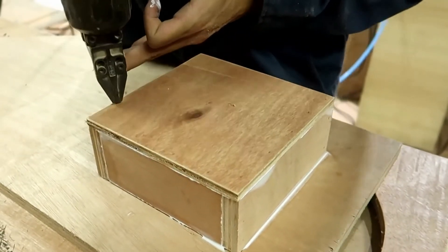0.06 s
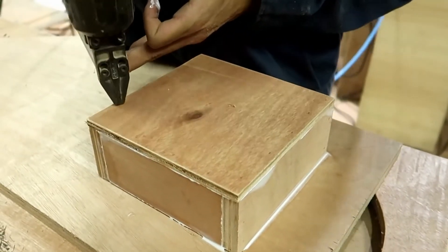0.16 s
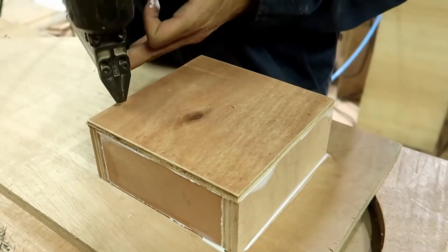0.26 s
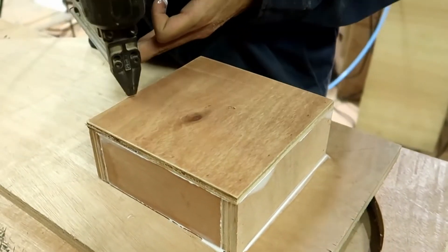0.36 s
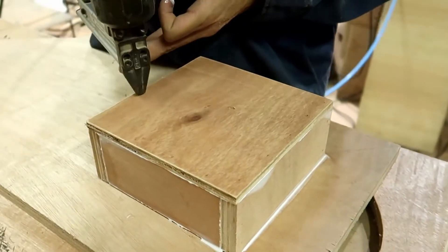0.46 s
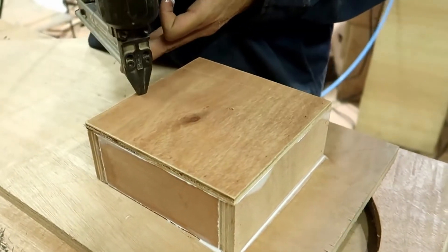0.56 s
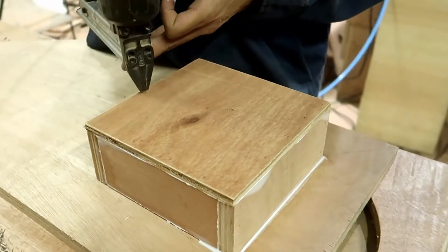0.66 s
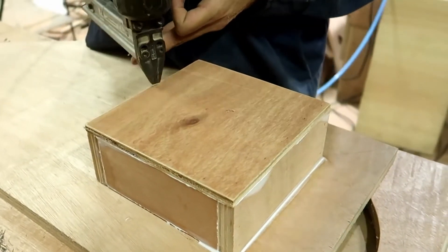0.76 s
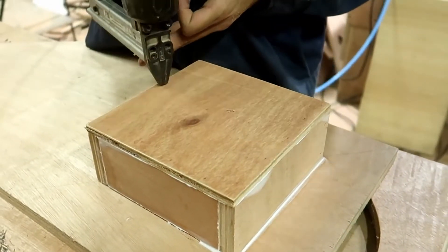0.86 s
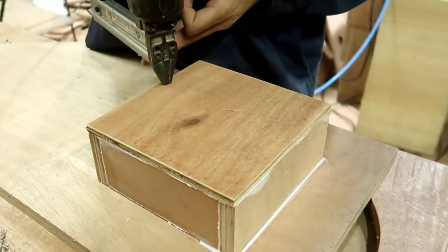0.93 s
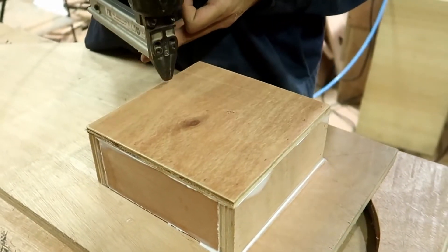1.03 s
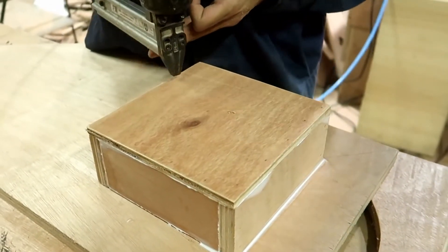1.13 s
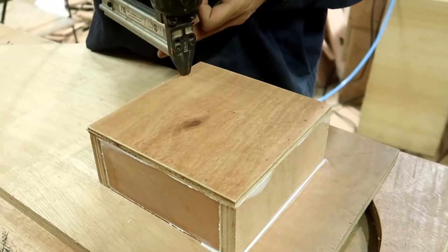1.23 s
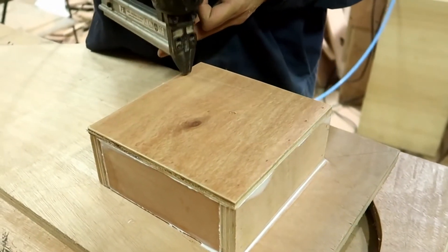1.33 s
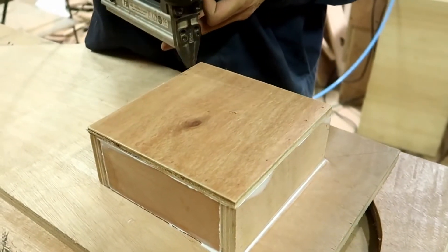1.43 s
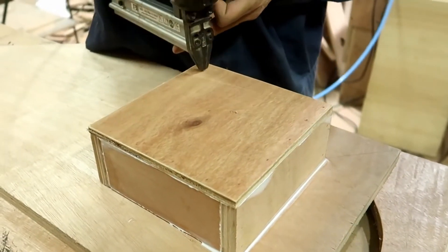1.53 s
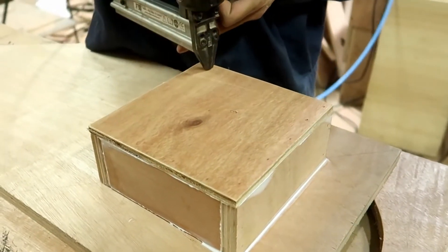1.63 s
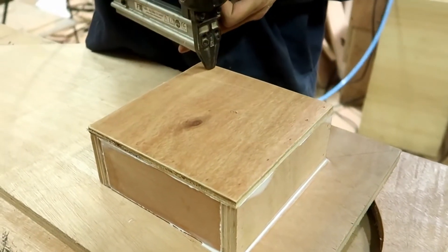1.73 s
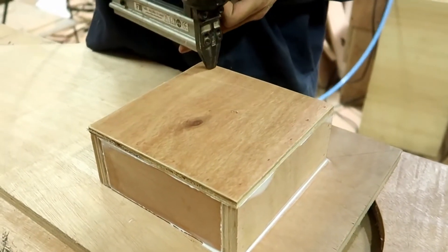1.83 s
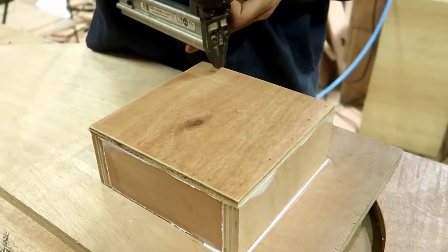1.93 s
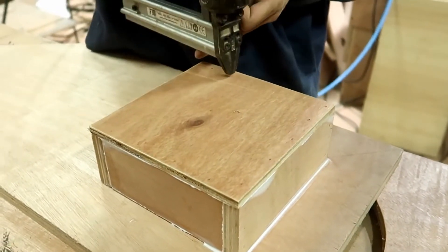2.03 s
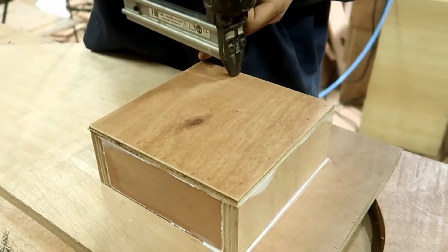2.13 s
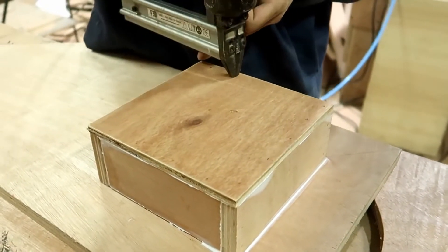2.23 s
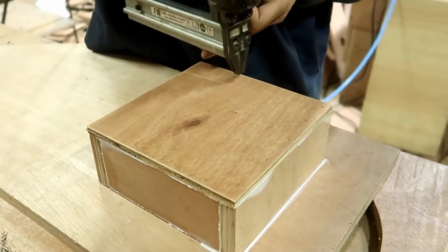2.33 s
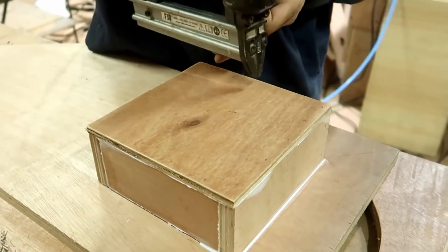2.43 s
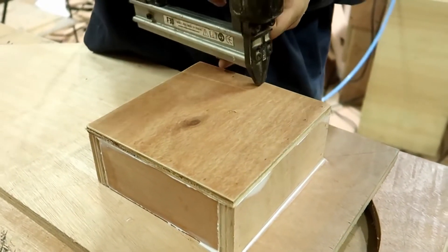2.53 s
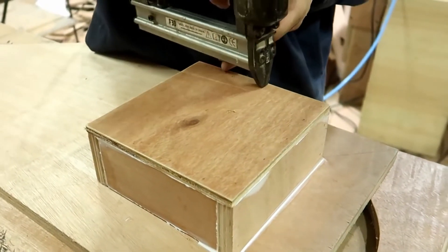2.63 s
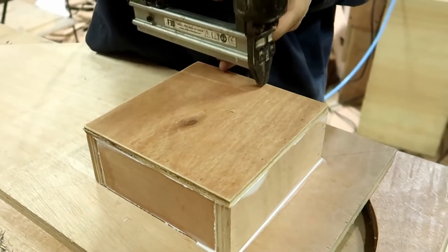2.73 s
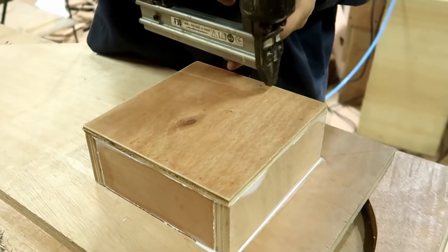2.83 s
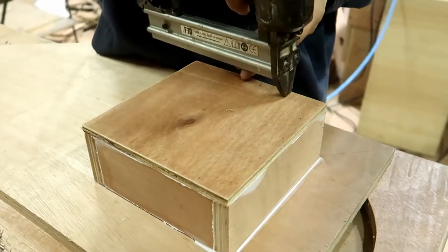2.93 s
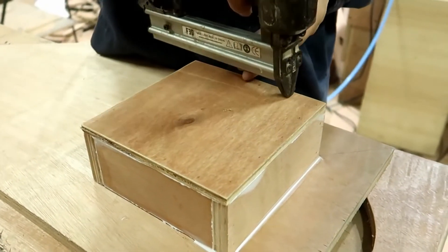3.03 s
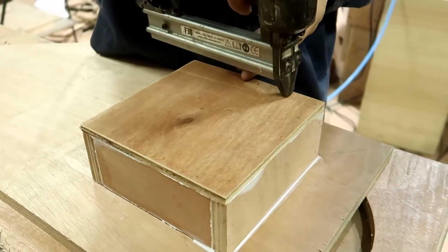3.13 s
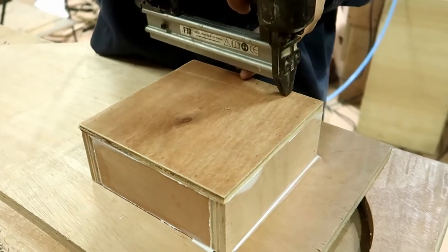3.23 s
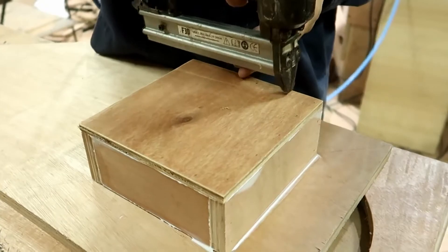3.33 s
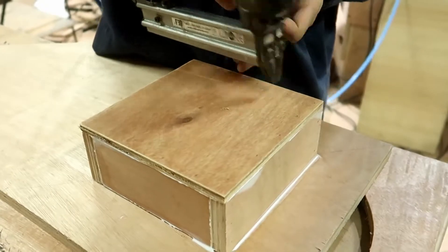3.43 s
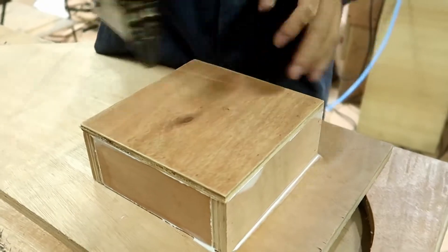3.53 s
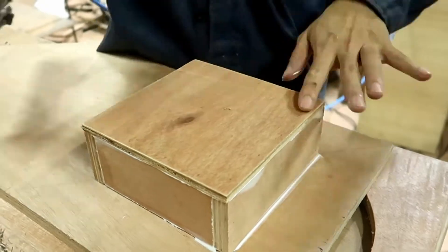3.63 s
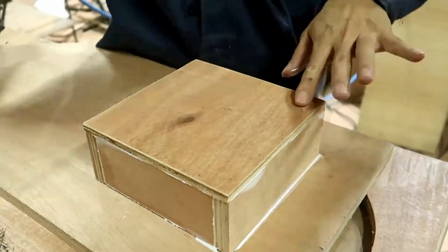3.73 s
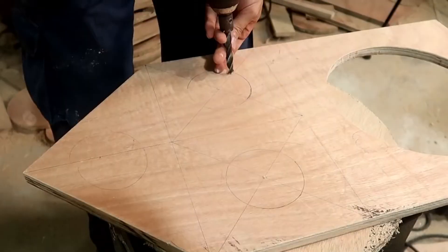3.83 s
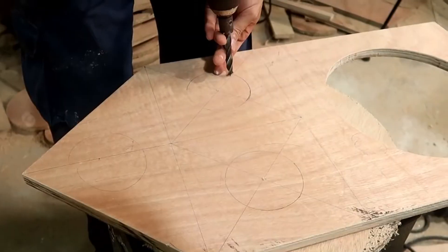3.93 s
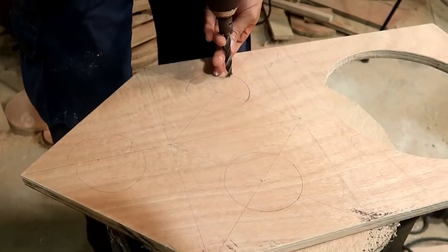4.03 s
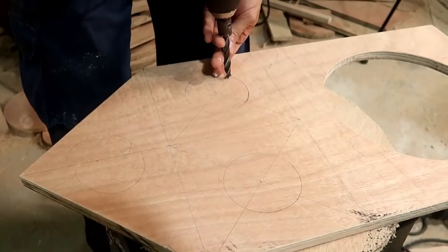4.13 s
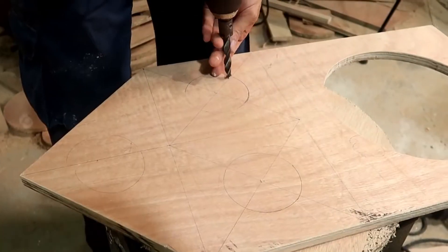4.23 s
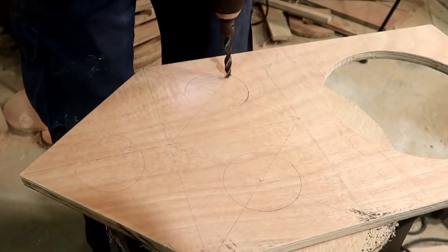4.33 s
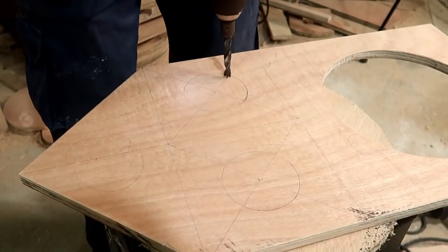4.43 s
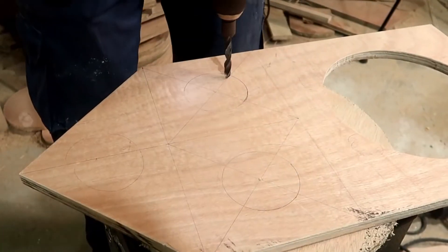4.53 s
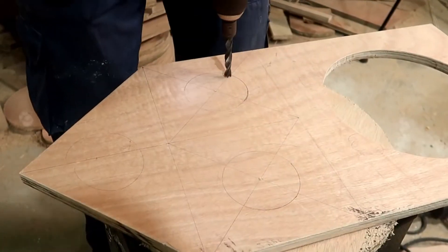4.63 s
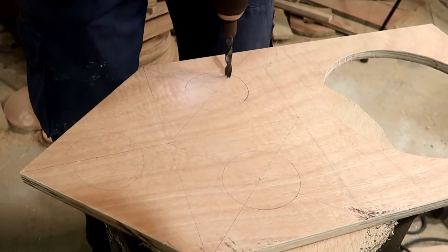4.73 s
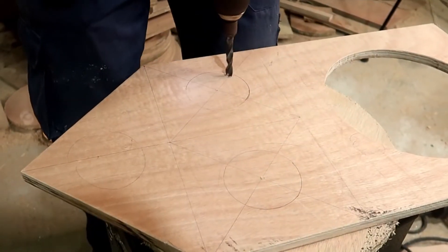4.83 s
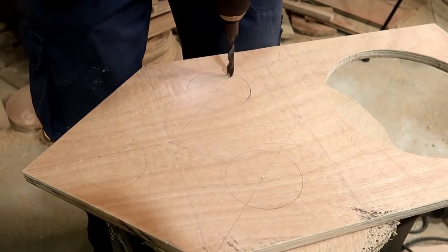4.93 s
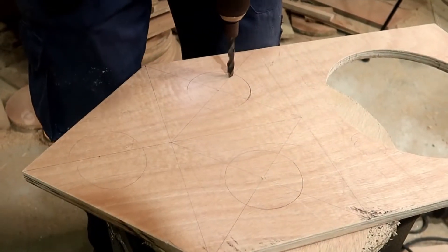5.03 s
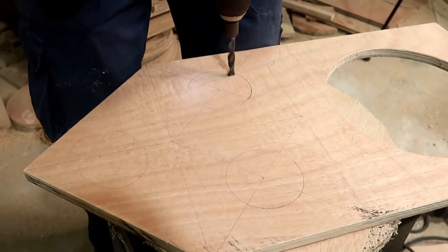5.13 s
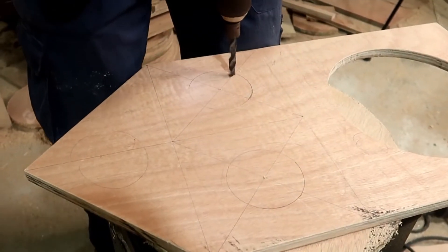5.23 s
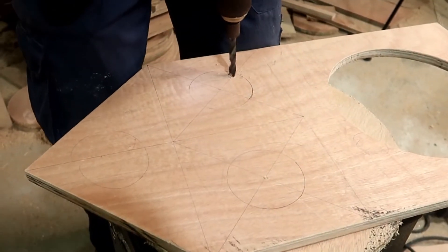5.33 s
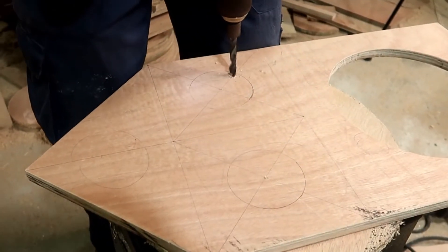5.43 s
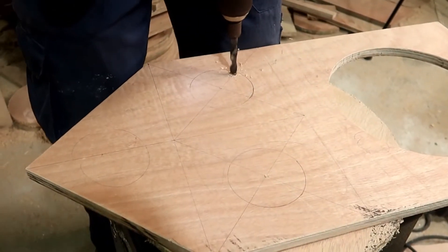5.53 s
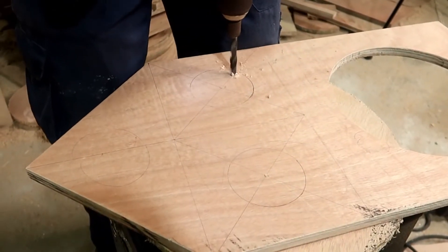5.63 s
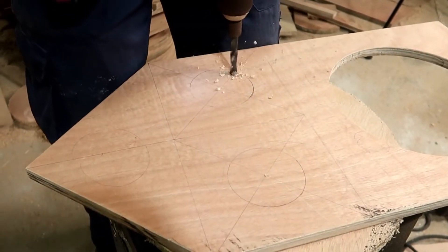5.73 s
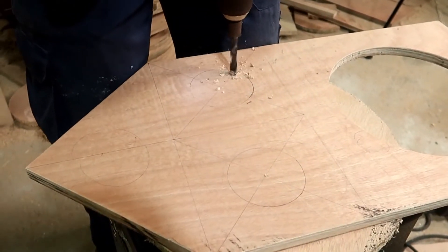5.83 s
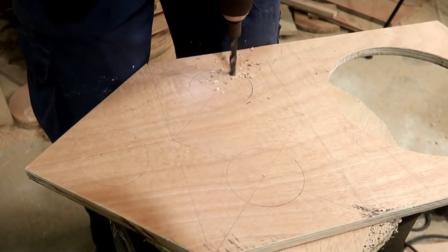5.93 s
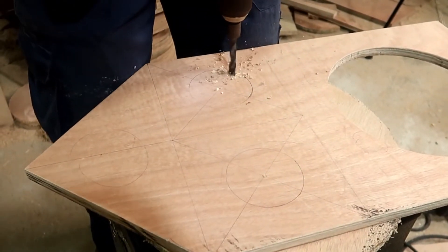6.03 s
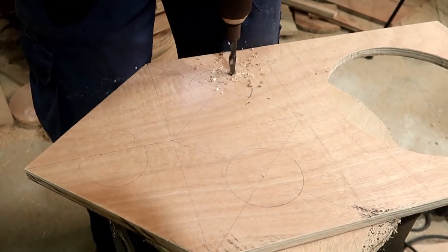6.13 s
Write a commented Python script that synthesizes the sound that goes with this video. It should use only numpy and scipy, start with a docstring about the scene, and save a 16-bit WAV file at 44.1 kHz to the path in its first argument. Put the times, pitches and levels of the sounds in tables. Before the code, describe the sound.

The tail of an exhaust puff opens a quiet workshop. Eight close pneumatic nailer shots hit a hollow plywood box at about 0.34, 0.68, 1.09, 1.41, 1.93, 2.34, 2.82 and 3.41 seconds. Each has a soft hiss swelling just before a sharp double crack, woody knock and rattle, then some 70 milliseconds later an exhaust puff and metallic clack. The fourth and fifth are weaker, the last two loudest; faint nose taps fall between, with a short room tail. At 3.81 comes a tiny gap, then a noisier shed: low hum and lumpy wind knocks on the microphones. Trigger clicks come at 4.09 and 4.4-4.48, with thin high squeaks. From 4.5 the drill growls slowly, rises steeply after 4.8 and reaches full whine by 5.3. Around 5.67 the bit sinks in: louder throbbing rasp, crackling chips and a straining whine that sags towards 6.17.

```python
"""In a quiet workshop a pneumatic nail gun fires eight brads into a plywood box: a soft hiss swelling just before
the blow, the blow on the nail, exhaust puff and clack of the returning piston, from shaped noise and ringing
modes with a noise-tail room. After a short gap comes a noisier shed: low noise and pressure knocks are wind on
the microphones, and an electric drill spins up and bores into a panel, from speed-following tones, motor rush
and random chips."""
import sys
import numpy as np
from scipy import signal
from scipy.io import wavfile
from scipy.ndimage import uniform_filter1d

SR = 44100
rng = np.random.default_rng(int(sys.argv[2]) if len(sys.argv) > 2 else 0)


def put_to_file(sound):
    """Save the sound as 16-bit audio at rate SR, in the file named by the first command-line argument."""
    columns = np.atleast_2d(sound).T  # one column per channel
    safe = np.clip(columns, -1, 1)
    whole_steps = np.round(safe * 32767)
    wavfile.write(sys.argv[1], SR, whole_steps.astype(np.int16))


N = 272097
LEAD = 4410  # samples before time zero
EVENT = 2600  # samples in a short event
EVENT_MS = np.arange(EVENT) / SR * 1000 - 10  # zero at the peak of swell()
TIME_S = np.arange(N) / SR


def amp(db):
    """Gain of a level in dB."""
    return 10 ** (np.asarray(db) / 20)


def evened(x):
    """Scaled to rms 1."""
    return x / np.sqrt(np.mean(x ** 2) + 1e-20)


def read(points, hz):
    """Value of a spectrum on a log-frequency axis."""
    f, value = np.transpose(points)
    return np.interp(np.log(hz + 1), np.log(f + 1), value)


def curve(rows):
    """Columns of a table at every sample, then a smoothed gate, 1 inside its time span."""
    s, *columns = np.transpose(rows)
    inside = 1. * (TIME_S > s[0]) * (TIME_S <= s[-1])
    return [np.interp(TIME_S, s, c) for c in columns] + [uniform_filter1d(inside, size=300)]


def add(mix, s, sound):
    """Mixes a sound in at s seconds; the mix starts LEAD samples early."""
    part = mix[LEAD + round(s * SR):][:len(sound)]
    part += sound[:len(part)]


def coloured(x, points):
    """Causal minimum-phase filter shaped by a spectrum, taps of unit energy."""
    log_gain = np.log(amp(read(points, abs(np.fft.fftfreq(4096, 1 / SR)))))
    taps = np.fft.ifft(np.exp(np.conj(signal.hilbert(log_gain)))).real[:2048]
    return signal.oaconvolve(x, taps / np.linalg.norm(taps))


def ring(modes, detune=.0, size=6000):
    """Dying sines of a struck body, levels and pitches scattered, peak 1."""
    t = np.arange(size) / SR
    x = np.zeros(size)
    for hz, db, t60 in modes:
        decay = amp(db - 60 * t / t60 + 3.7 * rng.standard_normal())
        x += decay * np.sin(2 * np.pi * hz * (1 + detune * rng.standard_normal()) * t)
    return x / abs(x).max()


def resonate(x, hz, width):
    """Shifts hz down to zero, smooths, and shifts back: a resonance of gain 1."""
    turn = np.exp(2j * np.pi * np.cumsum(hz * np.ones(len(x))) / SR)
    r = np.exp(-np.pi * width / SR)
    return 2 * (turn * signal.lfilter([1 - r], [1, -r], x / turn)).real


def noise(db, same, patchy_db):
    """Two channels of random short-time spectra, rms 1; db maps (Hz, s) to relative level."""
    frames, hz = N // 256 + 5, np.fft.rfftfreq(1024, 1 / SR)[:, None]
    a, b, c, d, patches = rng.standard_normal((frames, 513, 5)).T
    patches = uniform_filter1d(uniform_filter1d(patches, size=10, axis=0), size=10, axis=1)
    same = np.clip(read(same, hz), -1, 1)
    left = a + 1j * b
    right = same * left + np.sqrt(1 - same ** 2) * (c + 1j * d)
    level = amp(db(hz, np.arange(frames) * 256 / SR))
    level = level / np.sqrt((level ** 2).mean(0)) * amp(patchy_db * evened(patches))
    return evened(signal.istft(np.array([left, right]) * level, nperseg=1024, noverlap=768)[1][:, :N])


def steady(spectrum):
    """Level function for noise(): one spectrum at all times."""
    return lambda hz, t: read(spectrum, hz) + 0 * t


def swell(rise_ms, fall_ms):
    """Envelope that peaks at 10 ms and is gone by 59 ms."""
    end = np.clip((49 - EVENT_MS) / 25, 0, 1)
    rise, fall = np.exp(-(EVENT_MS / rise_ms) ** 2), np.exp(-np.maximum(EVENT_MS, 0) / fall_ms)
    return end * np.where(EVENT_MS < 0, rise, fall)


def burst(envelope):
    """White noise under an envelope."""
    return rng.standard_normal(EVENT) * envelope


# workshop air spectrum: f/Hz, relative level/dB
QUIET_SPECTRUM = [(20, -28), (60, -8.5), (180, -3), (300, -17), (600, -8.5), (1100, -16), (1700, -20.5),
                  (2500, -28), (4000, -34.5), (6000, -45), (16000, -62)]
# workshop air over time: t/s, level/dB
QUIET_LEVEL = [(0.15, -67), (0.63, -66.5), (0.93, -70), (1.8, -67), (2.03, -68.5), (2.32, -65.5),
               (2.51, -69), (2.75, -65), (2.86, -61.5), (3.8, -68)]


def quiet_air():
    """Workshop background: shaped noise, mostly separate in the two channels."""
    hiss = noise(steady(QUIET_SPECTRUM), [(50, 0.41), (9000, .05)], patchy_db=-2.0)
    return amp(curve(QUIET_LEVEL)[0]) * hiss


SHED_DB = -35
# shed spectrum: f/Hz, relative level/dB
SHED_SPECTRUM = [(59, -44), (100, 6), (424, -1), (583, -6.5), (768, 1.5), (891, -6.5), (1170, -3.5),
                 (1420, -5), (1610, -3.5), (3120, -14), (3320, -13), (14100, -40), (16000, -51)]


def shed_hum():
    """Shed background: shaped noise, nearly alike in both channels up to the treble."""
    same = [(200, 1.0), (550, 0.97), (1650, 1.0), (5000, 0.97), (15000, 0.085)]
    return amp(SHED_DB) * noise(steady(SHED_SPECTRUM), same, patchy_db=2.0)


# room decay: f/Hz, early t60/s
SHOP_T60 = [(100, 1), (400, 0.35), (1500, 0.35), (4000, 0.42), (9000, 0.35), (15000, 0.16)]
# room colour: f/Hz, level/dB
SHOP_COLOUR = [(100, -7.5), (300, -9.5), (1000, -6), (2000, -2.5), (5000, -4), (10000, -3), (16000, -9.5)]


def shop(x):
    """Noise tails, decay by band, faster later; four take turns, so the room never repeats one pattern."""
    out, turn = np.zeros(x.shape), np.arange(x.shape[1]) // 1500 % 4
    for k in range(4):
        taps = rng.standard_normal((2, SR // 2)) * (np.arange(SR // 2) > 200)
        hz, t, z = signal.stft(taps, SR, nperseg=256)
        decay_db = -60 * t / read(SHOP_T60, hz)[:, None] - 16 * (t / 0.17) ** 2
        z = z * amp(read(SHOP_COLOUR, hz)[:, None] + decay_db)
        tail = signal.istft(z, SR, nperseg=256)[1]
        tail = tail / np.linalg.norm(tail[0])
        out += signal.fftconvolve(x * (turn == k), tail, axes=1)[:, :x.shape[1]]
    return out


ROOM_BLOW_DB, ROOM_PUFF_DB = -17, -37  # send level, evened over the shots


def room_share():
    """Gain of the send to the room: larger where the direct sound of a shot is weak."""
    rows = [(r[0], ROOM_BLOW_DB - (r[2] + r[3]) / 2) for r in BLOWS]
    rows += [(r[0], ROOM_PUFF_DB - (r[2] + r[3]) / 2) for r in PUFFS]
    return amp(np.interp((np.arange(N + LEAD) - LEAD) / SR, *np.transpose(sorted(rows))))


LUMP_S, LUMP_DB = 0.011, 2.5  # random bumps of the wind: length, depth
# wind over time: t/s, level/dB before the bumps
WIND_LEVEL = [(3.83, -33.5), (3.87, -24.5), (3.99, -51), (4.08, -30), (4.13, -38), (4.51, -30.5),
              (4.57, -49), (4.86, -28), (4.9, -47), (4.97, -29), (5.0, -55), (5.21, -49), (5.24, -29),
              (5.45, -31.5), (5.5, -52), (5.53, -30), (6.02, -33.5), (6.17, -27)]
# wind spectrum: f/Hz, relative level/dB
GUST_SPECTRUM = [(20, -17), (60, 10), (120, 14.5), (250, 2.5), (450, 2), (900, -41)]
# strongest buffets: t/s, left level/dB, right level/dB, f/Hz at the peak
BUFFETS = [(3.8704, -20.5, -11, 220.3), (4.0525, -18, -13, 320), (4.0784, -14, -18, 332),
           (4.2114, -15.5, -23, 332), (4.2476, -23, -16.5, 244), (4.3162, -9, -10, 290),
           (4.388, -16, -16, 230), (4.408, -22, -16, 287), (4.4703, -13, -17, 235), (4.499, -14, -16, 161),
           (4.812, -14.5, -13.5, 223), (4.832, -19, -18, 210), (4.8614, -7, -10.5, 247),
           (4.962, -13.5, -13, 251), (5.27, -17, -10.5, 298), (5.297, -16, -17, 237),
           (5.3782, -9, -12.5, 330), (5.4191, -10, -10.5, 390), (5.542, -13, -14, 323),
           (5.695, -14.5, -20, 220), (5.9459, -17, -15.5, 244), (6.1515, -13, -18, 218)]


def wind():
    """Lumpy low noise, partly shared by the channels, with single pressure knocks."""
    lumps = noise(steady(GUST_SPECTRUM), [(40, .7), (150, .7), (500, .4)], patchy_db=1.5)
    mix = np.zeros((2, N + LEAD))
    for s, left_db, right_db, hz in BUFFETS:
        for side, db in zip(mix, (left_db, right_db)):
            # the swing slows as it dies
            cycles = hz / 1000 * EVENT_MS * (1 - 0.047 * np.clip(EVENT_MS, 0, 30))
            phase = .5 * rng.standard_normal()
            knock = np.cos(2 * np.pi * cycles + phase) * swell(650 / hz, 800 / hz)
            add(side, s - .01 + 0.00057 * rng.standard_normal(), -amp(db) * knock)
    window = np.hanning(round(2 * LUMP_S * SR))[None]
    bumps = evened(signal.oaconvolve(rng.standard_normal((2, N)), window, "same"))
    return amp(curve(WIND_LEVEL)[0] + LUMP_DB * (bumps - 0.5)) * lumps + mix[:, LEAD:]


def sides(mix, s, lag_ms, left_db, right_db):
    """Channel, start s and level dB on each side."""
    return zip(mix, (s + lag_ms / 1000, s), (left_db, right_db))


# nose of the gun set down on the lid: t/s, mean level/dB, f/Hz, left-right level/dB
TOUCHES = [(0.236, -50.5, 151, -4.5), (0.584, -54, 271, -3.5), (0.952, -59, 150.6, 16), (1.83, -53, 179, 3),
           (2.165, -44.5, 170, 2.5), (2.713, -52, 236, -3), (3.054, -48.5, 243, 4.5)]


def touches(mix):
    """Nose on the lid: three dying modes."""
    for s, db, hz, pan_db in TOUCHES:
        thud = ring([(hz, 0, .12), (hz * 1.7, -6, .07), (hz * 2.6, -12, .05)])
        for side, sign in zip(mix, (1, -1)):
            add(side, s, amp(db + sign * pan_db / 2) * thud)


# modes struck by the returning piston: f/Hz, level/dB, t60/s
CAP_MODES = [(1160, -19.5, 0.004), (1990, -2.5, 0.013), (2860, -15, 0.018), (5400, -9, 0.004),
             (8150, -19.5, 0.0056)]
# piston clacks: right t/s, left lag/ms, left peak level/dB, right peak level/dB
CLACKS = [(0.413, 6, -7.5, -15), (0.7599, -1.5, -9.5, -6.5), (1.1624, 2., -5, -5), (1.4792, -1.5, -6, -16),
          (2.0051, 1.64, -8, -11.5), (2.403, 3.5, -4.5, -15), (2.8998, -1.23, -3, -2),
          (3.4806, 1.1, -4.5, -10.5)]


def clacks(mix):
    """Returning piston: three impulses ring the cap modes."""
    for s, lag_ms, left_db, right_db in CLACKS:
        taps = np.zeros(300)
        taps[[0, 42, 190]] = .55, -1, -.3  # first touch, full stop, rebound
        clack = signal.oaconvolve(taps, ring(CAP_MODES, .04, size=1500))
        for side, at, db in sides(mix, s, lag_ms, left_db, right_db):
            add(side, at - .0012, amp(db) * clack / abs(clack).max())


# airy noise of puffs, hiss before a blow and trigger clicks: f/Hz, relative level/dB
AIR_SPECTRUM = [(150, -43), (500, 1), (1500, 1.5), (3500, -4), (5700, -2.5), (8100, -4.5), (12000, -8),
                (16000, -16.5)]
# exhaust puffs: right t/s, left lag/ms, left level/dB, right level/dB, pressure swing level/dB over the hiss setting
PUFFS = [(-.045, 0., -22, -22, -5.5), (0.4103, 3.5, -18, -15, -3.5), (0.7536, -2, -14.5, -17, .5),
         (1.1553, 2, -14.5, -14.5, 2.5), (1.4695, 3, -20, -17, -1.5), (2.002, 0.5, -19.5, -18.5, -3.5),
         (2.4017, 3.5, -22, -16, 3), (2.8939, -2.5, -15, -21.5, -0.5), (3.473, 4.1, -17.5, -14, 5.5)]


def puffs(mix):
    """Exhaust: air noise with a short and a long fall, plus a 360 Hz pressure swing."""
    swing = np.cos(2 * np.pi * .36 * EVENT_MS) * swell(1.8, 2.6)
    hiss = swell(2.4, 3.4) + 0.2 * swell(5.8, 17.0) * signal.windows.tukey(EVENT, .2)
    for s, lag_ms, left_db, right_db, swing_db in PUFFS:
        for side, at, db in sides(mix, s, lag_ms, left_db, right_db):
            add(side, at - .01, amp(db) * coloured(burst(hiss), AIR_SPECTRUM))
            add(side, at - .0085, -amp(db + swing_db) * swing)


KNOCK_DB, KNOCK_T60_S = -7.5, 0.027  # lid knock: level over the blow, decay
# plywood box modes: f/Hz, level/dB, t60/s
BOX_MODES = [(198, 1, 0.17), (320, -3.5, 0.011), (495, 3, .05), (672, -8, 0.19), (962, 5.5, 0.028),
             (1390, -7, 0.011), (1520, -8, .03), (1870, -5.5, 0.033), (2520, -7.5, .025),
             (3000, -6.5, 0.025)]
# blow spectrum: f/Hz, relative level/dB
CRACK_SPECTRUM = [(130, -29), (220, -2), (975, -1), (2000, -5.5), (2520, -13), (4020, -14.5), (5550, -12),
                  (6410, -19), (9180, -21), (11400, -25), (13400, -23.5), (15200, -32.5), (16000, -41)]
# driver blows: right t/s, left lag/ms, left peak level/dB, right peak level/dB,
# level/dB of the hiss swelling before the blow, box boom level/dB, bench thump level/dB
BLOWS = [(0.3411, 2.5, -7, -2.5, -39.5, -26.5, -48), (.682, -0.5, -5.5, -6, -42.5, -32, -49.5),
         (1.0944, 0., -7.5, -6.5, -44, -32, -47.5), (1.414, 1, -11.5, -10, -37.5, -28, -49.5),
         (1.9349, 0., -13, -14.5, -36, -26, -17.5), (2.3354, -1.36, -4.5, -5.5, -36, -27, -43),
         (2.8219, 3, -2, -0.5, -32.5, -20, -34), (3.4079, 1.1, -2.5, .5, -31, -20, -33.5)]


def blows(mix):
    """Soft hiss swelling just before two driver impacts and noise; ringing, rattling box and bench thump."""
    for s, lag_ms, left_db, right_db, hiss_db, boom_db, thump_db in BLOWS:
        crack = .25 * burst(swell(2.0, 1.8))
        crack[353] -= 1.8  # the driver meets the nail
        crack[441] += 3.0  # two ms later the piston bottoms out
        knock = ring([(hz, db, KNOCK_T60_S) for hz, db, _ in BOX_MODES[4:8]], .06)
        boom = ring(BOX_MODES[:2], 0.026)
        thump = ring([(72.4, -14, 0.044), (146, 0, 0.025)], 0.027)
        for side, at, db in sides(mix, s, lag_ms, left_db, right_db):
            blow = coloured(crack + .2 * burst(swell(2.0, 2.5)), CRACK_SPECTRUM)
            add(side, at - .01, amp(db) * blow / abs(blow).max())
            add(side, at - .002, amp(db + KNOCK_DB) * knock)
            shake = burst(swell(1.0, 18.0))  # the loose lid keeps rattling its modes
            rattle = evened(signal.oaconvolve(shake, ring(BOX_MODES[2:], .08)))
            add(side, at - .01, amp(db - 37.0) * rattle)
            add(side, at - .01, amp(db - 28.0) * coloured(shake, CRACK_SPECTRUM))
            add(side, at - .001, amp(thump_db) * thump)
            add(side, at - .002, amp(boom_db) * boom)
            add(side, at - .021, amp(hiss_db) * coloured(burst(swell(3.1, 20.5)), AIR_SPECTRUM))


def gun():
    """Blow, puff and clack of a shot have their own times and strengths in the left and right channels."""
    mix = np.zeros((2, N + LEAD))
    for part in (touches, clacks, puffs, blows):
        part(mix)
    return mix


QUIET_END_S = 3.808  # start of the 6.8 ms fade


def workshop():
    """The gun, its room and the quiet air, faded out before the shed."""
    dry = gun()
    fade = np.clip((QUIET_END_S - TIME_S) / 0.0068 + 1, 0, 1)
    return ((dry + shop(dry * room_share()))[:, LEAD:] + quiet_air()) * fade


# trigger clicks: t/s, level/dB
TRIGGER = [(4.09, -42.5), (4.403, -40), (4.449, -38), (4.481, -24)]


def trigger():
    """Short bursts of air-coloured noise."""
    mix = np.zeros(N + LEAD)
    for at, db in TRIGGER:
        add(mix, at - .01, amp(db) * coloured(burst(swell(0.23, 2.2)), AIR_SPECTRUM))
    return mix[LEAD:]


# stepped squeaks of the speed control: t/s, length/s, start f/Hz, end f/Hz, level/dB
SQUEAKS = [(4.399, 0.033, 12700, 12650, -50), (4.437, .034, 12700, 13500, -52),
           (4.464, .016, 12900, 12450, -44), (4.48, .018, 12700, 12900, -47),
           (4.496, .027, 11700, 11950, -43), (4.52, .03, 12500, 12500, -42),
           (4.557, 0.024, 11800, 11600, -46), (4.59, .07, 12400, 12300, -44),
           (4.67, 0.04, 11700, 11700, -44), (4.7, 0.075, 12200, 12350, -47), (4.8, .029, 12400, 12250, -43),
           (4.835, 0.073, 12650, 12750, -48), (5.12, .09, 12500, 12500, -46)]


def squeaks():
    """Short high tones, slightly rough."""
    mix = np.zeros(N + LEAD)
    for s, length, hz, end_hz, db in SQUEAKS:
        size = round(length * SR)
        rough_hz = 500 * uniform_filter1d(rng.standard_normal(size), size=60)
        phase = 2 * np.pi * np.cumsum(np.linspace(hz, end_hz, size) + rough_hz) / SR
        add(mix, s, amp(db) * np.sin(phase) * signal.windows.tukey(size, .3))
    return mix[LEAD:]


def whine(hz, width):
    """A tone blurred by noise in a resonance that follows it."""
    tone = np.sqrt(2) * np.sin(2 * np.pi * np.cumsum(hz) / SR)
    return 1.11 * tone + 0.59 * evened(resonate(rng.standard_normal(N), hz, width))


FULL_HZ = 380  # armature at full speed, turns/s
GROWL_DB, GROWL_SAG_DB, GROWL_HZ = -39, -25, 248  # gear slap: at rest, change at GROWL_HZ turns/s
# gear mesh, swelling at the gear case resonances: f/Hz, level/dB
MESH_LEVEL = [(440, -60), (600, -47), (730, -35), (1100, -33.5), (1270, -28.5), (1480, -41.5), (1725, -35),
              (1860, -42), (1920, -37.5)]
# upper tones: multiple of armature speed, level/dB before the housing
UPPER = [(12, -42), (15, -37), (20, -34), (25, -36), (30, -37)]
# housing response: f/Hz, gain/dB
HOUSING_GAIN = [(3900, -30), (4500, 0), (5400, -1), (5750, -6), (6400, -24), (7000, -24), (7550, -5),
                (7900, -24), (8900, -20), (9500, -4), (10200, -7), (10900, -26)]
# armature tones: multiple of armature speed, level/dB at full speed
ORDERS = [(1, -37), (2, -44), (3, -41)]


def gear_tones(speed):
    """Five-tooth mesh, upper tones through the housing, gear slap fading with speed, armature orders."""
    tones = amp(read(MESH_LEVEL, 5 * speed)) * whine(5 * speed, 15.)
    fast = np.clip((speed - 255) / 65, 0, 1)
    for k, db in UPPER:
        tones += amp(db + read(HOUSING_GAIN, k * speed)) * fast * whine(k * speed, 6 * k)
    slap = sum(evened(resonate(rng.standard_normal(N), k * speed, 70)) for k in (10, 15))
    tones += amp(GROWL_DB + GROWL_SAG_DB * (speed / GROWL_HZ) ** 3) * slap
    for k, db in ORDERS:
        tones += amp(db) * (speed / FULL_HZ) ** 9 * whine(k * speed, 5 * k)
    return tones


# whine while the bit cuts: t/s, f/Hz, level/dB, level/dB at 3 f, level/dB at 5 f
LOADED_WHINE = [(5.68, 385, -48, -54, -47), (5.73, 428, -37, -34, -51), (5.85, 430, -35.5, -48, -59),
                (5.97, 427.4, -35.5, -34, -30), (6.05, 398, -51, -38, -38), (6.12, 372.5, -46, -41, -56),
                (6.17, 355, -58, -32, -30)]


def strain():
    """Shifting whine under load: fundamental, third and fifth multiples."""
    hz, first_db, third_db, fifth_db, loaded = curve(LOADED_WHINE)
    levels = ((1, first_db), (3, third_db), (5, fifth_db))
    return loaded * sum(amp(db) * whine(k * hz, 12.0 * k) for k, db in levels)


# rush spectra spinning up, running free, cutting wood: f/Hz, relative level/dB
SLOW_SPECTRUM = [(290, -42), (500, -13), (784, -26), (906, -4.5), (1510, -11), (2610, -13), (6900, -22.5),
                 (7530, -19.5), (8960, -29.5), (9920, -18), (10800, -33), (12100, -21), (16000, -33)]
FREE_SPECTRUM = [(150, -27), (250, -16.5), (380, -21), (629, -30), (748, -11), (875, -19), (1140, -7),
                 (1450, -13), (1850, -7.5), (3060, -15), (7440, -15), (9830, -14), (12500, -30),
                 (15200, -23), (16000, -8)]
BORING_SPECTRUM = [(150, -22), (250, -1.5), (367, -10), (414, 5), (710, -13), (988, -4), (1280, -5),
                   (1470, -9.5), (2130, -3), (3400, -11.5), (3840, -5.5), (5930, -6.5), (6700, -6.5),
                   (14900, -19.5), (16000, -19)]
# motor shell bands: f/Hz, width/Hz, lift/dB
SHELL_BANDS = [(1310, 160, 0.5), (2660, 230, 2.5), (5000, 310, -0.5), (6500, 380, 2), (7600, 230, 2.5),
               (8550, 290, 5.5), (9800, 250, 2.5), (11400, 480, 4)]
# channel likeness of the rush: f/Hz, likeness/0-1
RUSH_LIKENESS = [(60, 0.98), (130, 0.92), (290, 0.59), (640, 1), (1410, 1.0), (3100, 1.0), (6820, 1),
                 (15000, 0.66)]


def rush():
    """Fan and brush noise, brighter with speed and coloured again under load."""
    def colour(hz, t):
        """Relative level dB of the rush at each frequency and frame."""
        fast = np.clip((np.interp(t, *np.transpose(SPEED)) - 180) / 160, 0, 1)
        bite = np.clip(np.interp(t, *np.transpose(BITE)), 0, 1)
        slow = read(SLOW_SPECTRUM, hz)
        free = slow + fast * (read(FREE_SPECTRUM, hz) - slow)
        shell = sum(db / (1 + (2 * (hz - f) / width) ** 2) for f, width, db in SHELL_BANDS)
        return free + bite * (read(BORING_SPECTRUM, hz) - free) + shell

    return noise(colour, RUSH_LIKENESS, patchy_db=1.53)


# panel ringing under the bit: f/Hz, width/Hz, relative level/dB
PANEL_MODES = [(512, 66, -1.5), (991, 67, 2), (1284, 45, 0.5), (1645, 98, -7), (2210, 120, -9),
               (2510, 220, -3), (2640, 250, -21), (5100, 200, -8), (6490, 170, -0.5), (7150, 450, 1),
               (8530, 330, -11)]


def chips(throb):
    """Random impulses, 1500 a second on average, throbbing and ringing the panel."""
    sizes = amp(3.14 * np.minimum(rng.exponential(1, N), 5))
    hits = sizes * (rng.random(N) < 1500 / SR) * rng.choice([-1, 1], N) * throb ** 3
    ringing = [amp(db) * np.sqrt(1 / width) * resonate(hits, f, width) for f, width, db in PANEL_MODES]
    return evened(sum(ringing))


RUSH_ON_S, RUSH_IDLE_DB, RUSH_GAIN_DB, RUSH_POWER = 4.49, -35.5, 10., 2.7  # grows with speed
CUT_S, CUT_RISE_S, CUT_DB = 5.67, 0.046, 5.5  # the bit sinks in
THROB_HZ, THROB, THROB_TWICE = 42, .17, .12  # rasp pulse: rate, depth, depth at twice the rate
# armature: t/s, speed/turns per s
SPEED = [(4.5, 88), (4.55, 113.3), (4.6, 135.8), (4.65, 152), (4.712, 165.8), (4.814, 174.5), (4.908, 227),
         (4.956, 253), (5.018, 296), (5.06, 317), (5.11, 333), (5.2, 345), (5.29, 374), (5.39, 383.6),
         (5.5, 380), (5.6, 371), (5.65, 375), (5.7, 386)]
# pressure on the bit: t/s, pressure/0-1
BITE = [(4.47, 0.14), (5.3, 0.46), (5.5, 0.77), (5.66, 0.56), (5.8, 0.95), (5.9, 0.55), (6.17, .8)]


def drill():
    """Gear and armature tones over the rush of the motor; the bit adds throbbing chips."""
    speed, on = curve(SPEED)
    tones = gear_tones(speed) * on + strain() + squeaks()
    cut_db = CUT_DB * np.clip((TIME_S - CUT_S) / CUT_RISE_S, 0, 1)
    rush_db = RUSH_IDLE_DB + RUSH_GAIN_DB * (speed / FULL_HZ) ** RUSH_POWER + cut_db
    bite = np.clip(curve(BITE)[0], 0, 1)
    running = np.clip((TIME_S - RUSH_ON_S) / 0.093 + .5, 0, 1)
    turn = 2 * np.pi * THROB_HZ * TIME_S
    throb = 1 + bite ** 2 * (THROB * np.sin(turn) + THROB_TWICE * np.sin(2 * turn))
    motor = rush() * throb + amp(-1.0) * bite * chips(throb)
    return tones + trigger() + amp(rush_db) * running * motor


SHED_START_S = 3.8275


def scene():
    """The workshop, a short gap, then the shed."""
    start = np.clip((TIME_S - SHED_START_S) / 0.001, 0, 1)
    return workshop() + (shed_hum() + wind() + drill()) * start


EDGE_HZ = 15900


def record(dry):
    """Hard overload just above full scale, then the band limit."""
    held = np.clip(dry, -1.05, 1.05)
    taps = signal.firwin(511, EDGE_HZ, window=("kaiser", 9), fs=SR)
    return signal.oaconvolve(held, taps[None], "same")


dry = scene()
out = record(dry)
put_to_file(out)
```